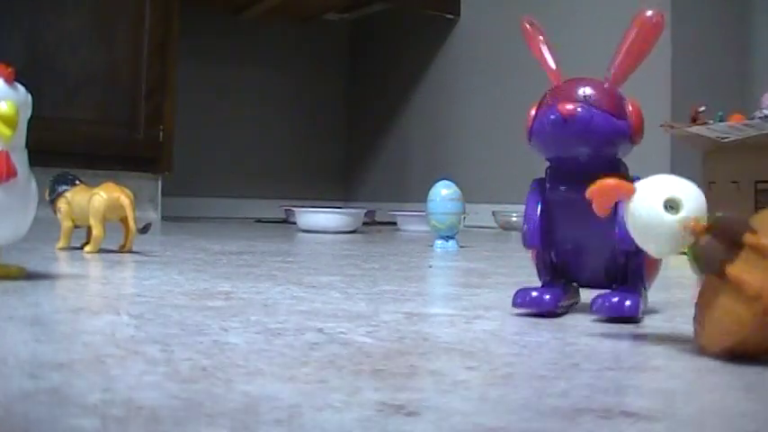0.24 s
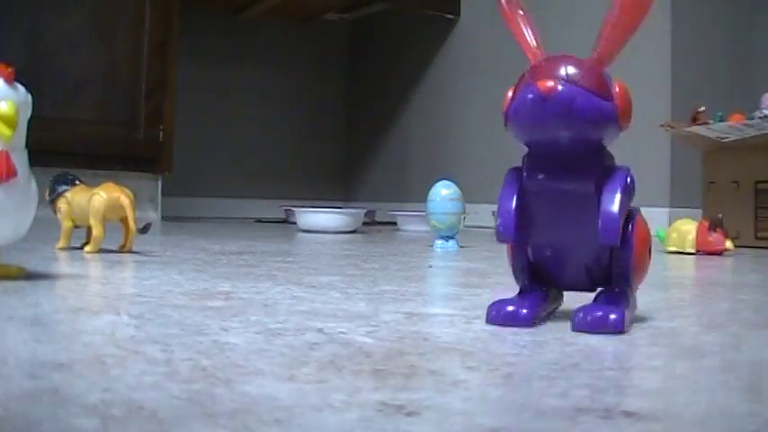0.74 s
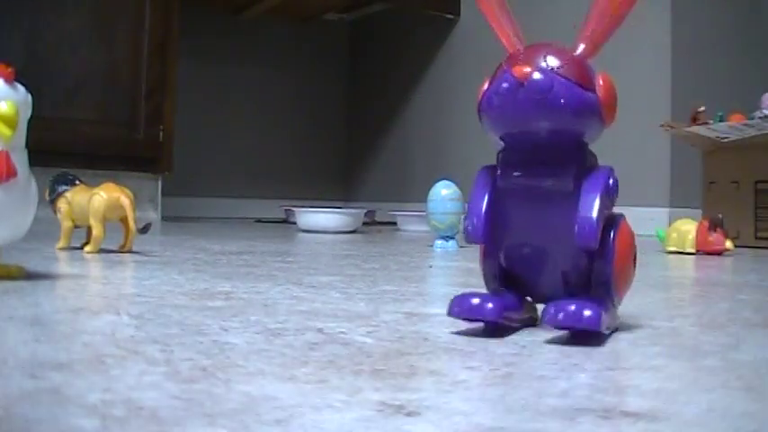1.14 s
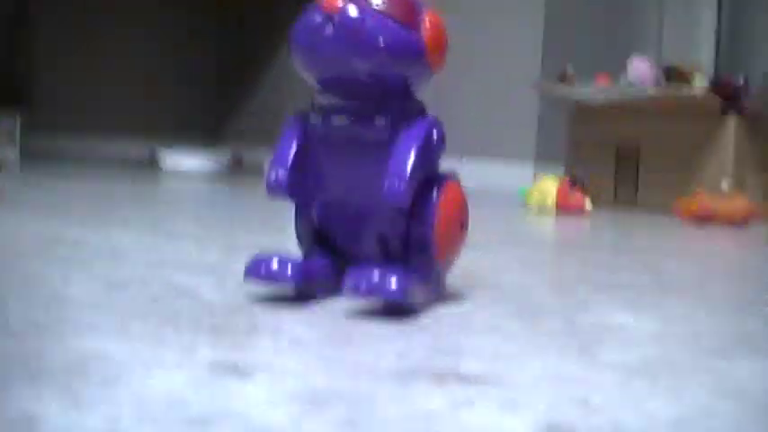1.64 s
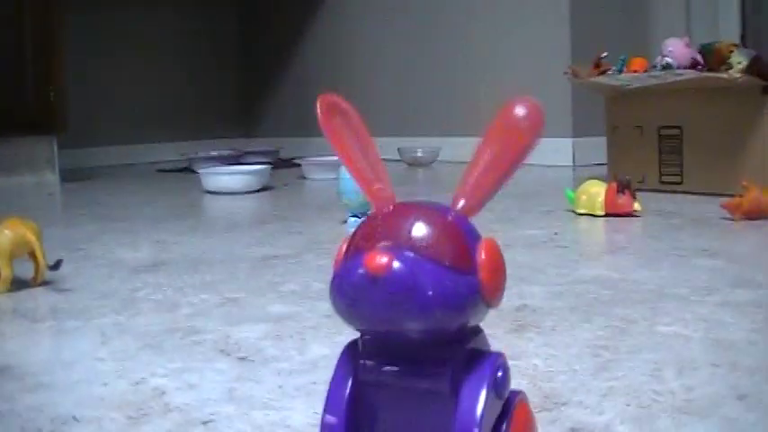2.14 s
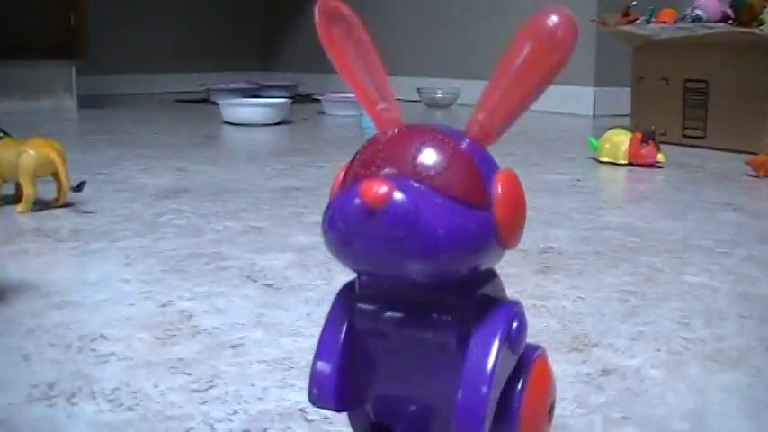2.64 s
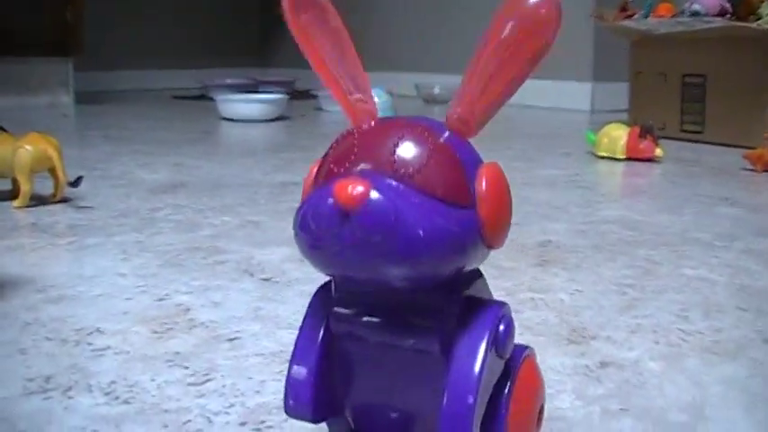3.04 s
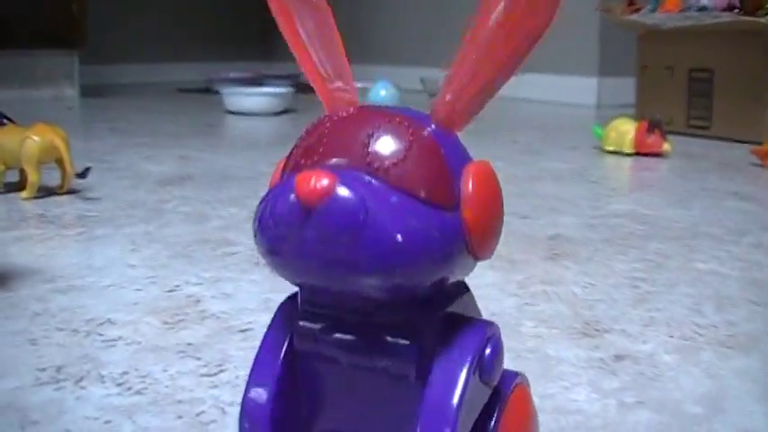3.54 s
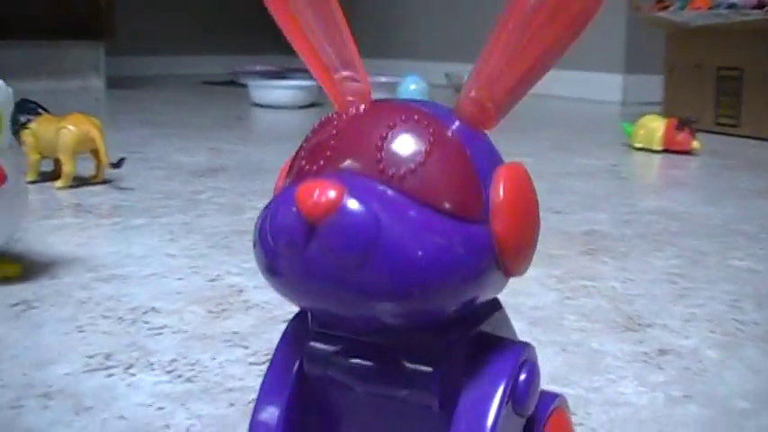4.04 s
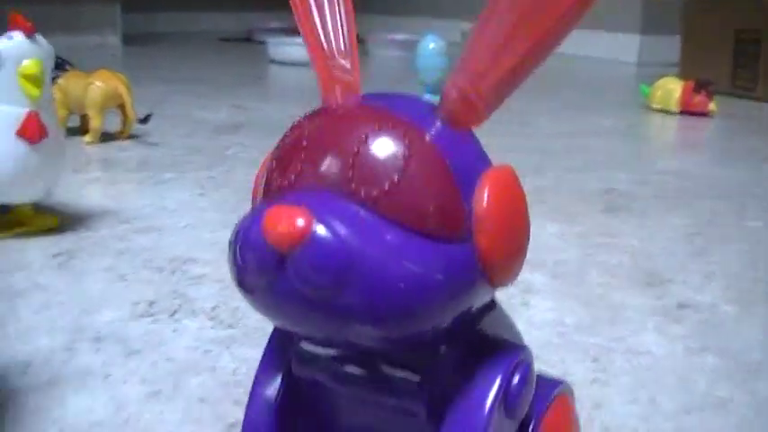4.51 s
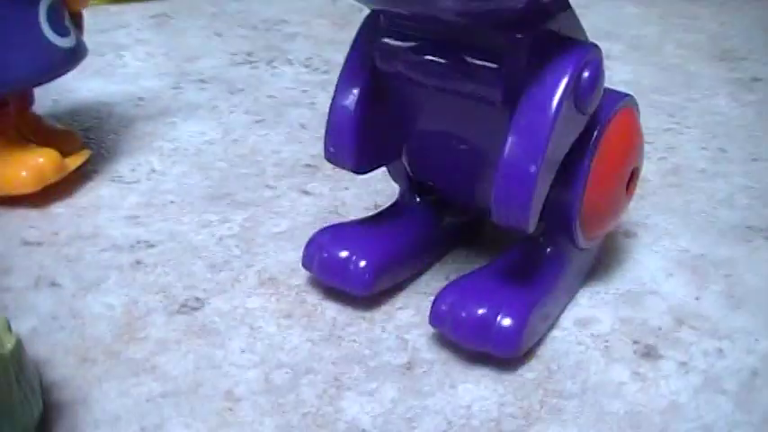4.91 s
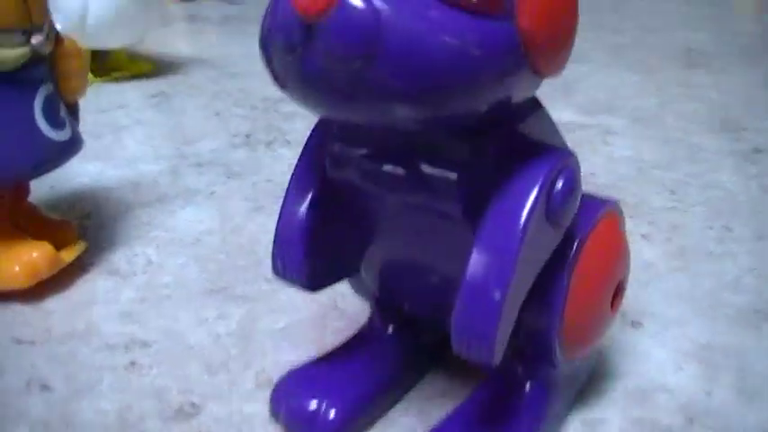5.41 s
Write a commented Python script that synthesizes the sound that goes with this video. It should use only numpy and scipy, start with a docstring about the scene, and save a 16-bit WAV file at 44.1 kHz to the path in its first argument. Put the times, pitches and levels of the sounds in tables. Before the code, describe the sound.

A plastic wind-up rabbit waddles over a hard kitchen floor with fast tick-tock clacks and whirring gears, gradually slowing, beside other rattling toys.

```python
"""Kitchen, hard floor, close by: a plastic wind-up rabbit waddles past at about six strides a second, slowing.
Each stride is a tick, a tap of the leg crank, a tock and a footfall: noise contacts through resonant modes.
Gear teeth whirr as trains of short noise pulses; other toys trundle over the floor and one is slid away.
The small room adds a ceiling echo and a short noise tail; still air lies under it all."""
import sys
import numpy as np
from scipy import signal
from scipy.fft import rfft, irfft
from scipy.io import wavfile

SR = 44100
rng = np.random.default_rng(int(sys.argv[2]) if len(sys.argv) > 2 else 0)


def wav_out(sig):
    """Save sig, one row per channel (or a flat mono array), as 16-bit PCM at SR to the path in sys.argv[1]."""
    wavfile.write(sys.argv[1], SR, np.round(np.clip(np.atleast_2d(sig).T, -1, 1) * 32767).astype(np.int16))


N = 250034
TIME = np.arange(N) / SR
AGE = np.arange(2048) / SR  # time since a contact, s

# tick opening each stride, and the crank tap after it: start_s, tick_db, ring_hz, rattle_db, tap_db
TICKS = [(0.046, -20, 11700, -6, -41), (0.2246, -20, 5200, -12, -30.5), (0.3939, -20.5, 4300, -13, -27),
         (0.5502, -22.5, 7600, -6, -31), (0.7078, -22, 4400, 14, -30), (0.8628, -20.5, 4530, -7.5, -34.5),
         (1.0441, -20, 5450, -3, -27.5), (1.191, -22, 7460, 9, -27), (1.3628, -22.5, 4200, -9, -27),
         (1.5408, -22.5, 4450, -7, -29), (1.7001, -23.5, 8940, -12, -28.5),
         (1.8596, -21.5, 7100, -5.5, -29.5), (2.036, -19, 8560, -7, -27.5),
         (2.2187, -18.5, 7000, -10.5, -27), (2.3776, -21.5, 7360, -16, -44), (2.5547, -19.5, 6700, -9, -28),
         (2.7133, -20.5, 9300, -12, -33.5), (2.963, -20, 7050, -17, -28), (3.1357, -20, 6900, -7, -46),
         (3.2989, -18.5, 8400, -11, -28.5), (3.4628, -21, 8200, -14, -22), (3.637, -19.5, 7240, -16, -28.5),
         (3.8078, -20.5, 6950, -8, -26.5), (3.976, -20, 7300, -9, -31.5), (4.1541, -21, 7200, -7.5, -28.5),
         (4.3209, -20, 8200, -14, -27.5), (4.5127, -19, 7760, -14, -32), (4.6835, -19, 7800, -12, -55),
         (4.91, -18, 6700, -14, -27.5), (5.1128, -21, 5130, -9, -50), (5.3593, -18, 7540, -8, -29.5),
         (5.6429, -18, 8600, -2.5, -40)]
# tock closing each stride, and the footfall after it: start_s, tock_db, ring_hz, rattle_db, fall_s, landing_db
TOCKS = [(0.1542, -33.5, 11900, -10, 0.016, -59), (0.3173, -18, 8550, -1, 0.036, -27),
         (0.471, -18, 4600, 15, 0.028, -34), (0.6353, -18.5, 4300, -3, 0.029, -28.5),
         (0.7811, -16.5, 7800, 15, .0261, -26.5), (0.9622, -16, 7860, 15, .0335, -26.5),
         (1.1178, -17, 4600, -7, 0.027, -30.5), (1.2828, -16.5, 8150, -13.5, 0.035, -33.5),
         (1.4552, -16.5, 7600, -3, 0.03, -35), (1.6239, -17.5, 4400, 6, 0.032, -32),
         (1.7848, -18.5, 4530, 1, 0.03, -30), (1.9546, -17.5, 8400, -14.5, 0.03, -30),
         (2.121, -18, 7800, 12, 0.028, -27), (2.3116, -16.5, 8000, -12.5, .0393, -32),
         (2.457, -16.5, 7900, 9, 0.035, -29.5), (2.649, -17.5, 8200, -5, 0.054, -27),
         (2.8016, -16.5, 7300, -13, .033, -34.5), (3.0665, -16.5, 7600, -1, .0376, -28),
         (3.206, -16.5, 7400, -10, 0.039, -26.5), (3.3878, -15.5, 7900, -6, .0396, -26.5),
         (3.548, -16, 8200, -15, .0395, -26.5), (3.728, -16.5, 7900, -4.5, 0.031, -30),
         (3.8987, -17.5, 8440, -11, 0.048, -30.5), (4.0624, -18, 7940, 1, 0.03, -38),
         (4.2441, -17, 8010, -15, 0.037, -31.5), (4.4053, -19, 4500, -2, 0.029, -31.5),
         (4.6233, -18, 8200, -1, 0.039, -27.5), (4.7612, -16.5, 8500, 0, 0.033, -31.5),
         (5.0402, -20, 4530, -9, 0.041, -29), (5.1914, -18, 7900, 14, 0.036, -31.5),
         (5.5092, -19, 7950, -3, 0.047, -33.5)]
# spectrum of the gear teeth: frequency_hz, density_db (per Hz)
TEETH = [(4000, -80), (5600, 12), (7600, 9.5), (9500, 10.5), (11500, 10), (13500, -6), (16000, -32)]


def from_db(db):
    """Decibels to gain."""
    return 10 ** (np.asarray(db) / 20)


def rms_one(x):
    """Scale to rms 1."""
    return x / np.sqrt(np.mean(x ** 2) + 1e-20)


def curve(rows):
    """Interpolate a two-column table over the scene."""
    s, values = np.transpose(rows)
    return np.interp(TIME, s, values)


def colour(x, points):
    """Shape a noise by a spectrum, falling 12 dB per octave below its first point."""
    hz, db = np.transpose(points)
    bins_hz = np.maximum(np.fft.rfftfreq(len(x), 1 / SR), 1)
    below = np.minimum(bins_hz / hz[0], 1) ** 2
    gain = from_db(np.interp(np.log(bins_hz), np.log(hz), db))
    return irfft(rfft(x) * below * gain, len(x))


def colour_noise(points):
    """Noise of a given spectrum, rms 1."""
    return rms_one(colour(rng.standard_normal(N), points))


def band(x, low_hz, high_hz, order=2):
    """Causal Butterworth band-pass."""
    high_hz = min(high_hz, 0.48 * SR)
    return signal.sosfilt(signal.butter(order, [low_hz, high_hz], btype="band", fs=SR, output="sos"), x)


def resonate(x, hz, width_hz):
    """One two-pole resonance, gain 1 on top."""
    r = np.exp(-np.pi * width_hz / SR)
    zeros = np.array([1, 0, -1]) * (1 - r * r) / 2
    poles = [1, -2 * r * np.cos(2 * np.pi * hz / SR), r * r]
    return signal.lfilter(zeros, poles, x + 1e-18)


def body(x, modes):
    """Modes of a part ringing side by side."""
    return sum(from_db(db) * resonate(x, hz, width_hz) for hz, width_hz, db in modes)


def contact(snap_s, rattle_db, rattle_s, grit_db):
    """Noise burst: a snap peaking at snap_s, then uneven tiny rebounds peaking at rattle_s that settle."""
    snap = (AGE / snap_s) ** 2 * np.exp(2 - 2 * AGE / snap_s)
    rebounds = np.repeat(from_db(grit_db * rng.standard_normal(len(AGE) // 32)), 32)
    swell = AGE / rattle_s * np.exp((1 - (AGE / rattle_s) ** 2) / 2)
    rattle = from_db(rattle_db) * swell * rebounds
    return rng.standard_normal(len(AGE)) * np.hypot(snap, rattle)


def add(out, start_s, sound, edges_hz, levels_db):
    """Place one hit, each register set to its own rms over the first 12 ms."""
    first, start = int(0.012 * SR), int(start_s * SR)
    for low_hz, high_hz, db in zip(edges_hz, edges_hz[1:], levels_db):
        part = band(sound, low_hz, high_hz, order=3)
        part = part * from_db(db) / np.sqrt(np.mean(part[:first] ** 2))
        out[start:start + len(part)] += part[:N - start]


def tooth_pulses(per_s, uneven, decay_s, spread_db):
    """Each tooth slipping into mesh gives a brief pulse; slack gears tick unevenly (in tooth spacings)."""
    turned = np.cumsum(per_s) / SR
    teeth = np.arange(int(turned[-1]))
    slack, size = rng.standard_normal((2, len(teeth)))
    at = np.searchsorted(turned, teeth + slack * np.interp(teeth, turned, uneven))
    clicks = np.zeros(N)
    clicks[np.minimum(at, N - 1)] = from_db(spread_db * np.clip(size, -2, 2))
    pulse = (AGE / decay_s) ** 2 * np.exp(-AGE / decay_s)
    return rms_one(signal.fftconvolve(clicks, pulse)[:N])


def gear_train(per_s, uneven, teeth_gain, chatter_gain):
    """Teeth tick brightly and the gear case chatters, jolting at half the tooth rate."""
    # frequency_hz, density_db (per Hz)
    chatter_colour = [(900, -3.5), (1300, -0.5), (2000, -3.5), (2700, -3), (3600, -3.5), (4500, 1.5),
                      (5400, -2), (6500, -10)]
    per_s, uneven = per_s * np.ones(N), np.full(N, uneven)
    pulses = tooth_pulses(per_s, uneven, decay_s=0.00048, spread_db=2)
    jolts = tooth_pulses(per_s / 2, np.ones(N), decay_s=0.0008, spread_db=3)
    # slack gears also grind between their ticks
    pulses = rms_one(np.hypot(pulses, 2 * uneven))
    teeth = teeth_gain * pulses * colour_noise(TEETH)
    chatter = chatter_gain * rms_one(pulses + jolts) * colour_noise(chatter_colour)
    return teeth + chatter


def efforts(tick_offset_db):
    """Every beat as (start_s, effort_db re the hardest tock), the ticks offset."""
    hardest_db = max(db for _, db, *_ in TOCKS)
    beat_sets = ((TICKS, tick_offset_db), (TOCKS, 0))
    return [(s, db + offset_db - hardest_db) for rows, offset_db in beat_sets for s, db, *_ in rows]


def still_air():
    """Steady faint noise, strongest in the bass."""
    # frequency_hz, density_db (per Hz)
    air_colour = [(25, 4), (60, -4), (100, -8), (150, -2), (260, -2), (600, -8), (2000, -16), (8000, -21),
                  (16000, -28)]
    return from_db(-59) * colour_noise(air_colour)


def rolling():
    """Floor modes drum under trundling toys, whose gears rattle more steeply as they push harder."""
    # start_s, level_db
    push = [(0, -49.5), (.08, -37), (.22, -42), (.3, -33), (.45, -35), (.63, -31.5), (.79, -33.5),
            (.86, -40), (1.2, -45), (1.42, -35.5), (1.62, -37.5), (1.85, -45), (2.1, -43.5), (2.9, -58),
            (3.3, -50), (4, -60), (5.3, -59)]
    # floor modes: frequency_hz, width_hz, gain_db
    floor = [(140, 19, 1.5), (212, 8.2, -34), (260.7, 13.6, 10.5), (363, 130, 6), (539, 46, 7),
             (609, 62, -2.5), (780, 45, -16), (1190, 1100, -12)]
    teeth_per_s, uneven = 260, 0.2
    usual_db, steepness = -35, 2.02
    teeth_at_usual_db, chatter_at_usual_db = -41.5, -33.5
    level_db = curve(push)
    effort_db = steepness * (level_db - usual_db)
    jolts = tooth_pulses(np.full(N, teeth_per_s / 2), np.ones(N), decay_s=0.0011, spread_db=-1.5)
    floor_ring = body(jolts * rng.standard_normal(N), floor)
    drum = from_db(level_db - 0.5) * rms_one(band(floor_ring, low_hz=215, high_hz=2400))
    teeth_gain = from_db(teeth_at_usual_db + effort_db)
    chatter_gain = from_db(chatter_at_usual_db + effort_db)
    train = gear_train(teeth_per_s, uneven, teeth_gain, chatter_gain)
    case = from_db(-12) * resonate(train, hz=4420, width_hz=120)
    return drum + train + case


def spin():
    """Gear motion: each beat sets it going by its strength, then it brakes; weaker as the spring runs down."""
    spin_s, run_down_db_per_s = 0.06, 2.6
    motion = np.zeros(N)
    for s, db in efforts(tick_offset_db=-8):
        motion += from_db(db) * (TIME > s) * np.exp(-((TIME - s) / spin_s) ** 2 / 2)
    return motion * from_db(-run_down_db_per_s * TIME)


def run_up(span_s):
    """Friction building before each beat, steeply more for a hard one; fades as the spring runs down."""
    steepness, fade_db_per_s = 2.4, 0.5
    s, db = np.transpose(efforts(tick_offset_db=-4))
    drops = np.zeros(N)
    drops[(s * SR).astype(int)] = from_db(steepness * db - fade_db_per_s * s)
    # a decay run backwards in time
    return signal.lfilter([1], [1, -np.exp(-1 / (span_s * SR))], drops[::-1] + 1e-18)[::-1]


def gears():
    """The rabbit's gears spin in spurts, chatter under load and rub the pallet before each beat."""
    teeth_per_s, uneven = 150, 0.25
    teeth_db, chatter_db, load_db, rub_db = -37, -33, -25.5, -21.5
    motion, load = spin(), run_up(span_s=0.012)
    chatter_gain = from_db(chatter_db) * motion + from_db(load_db) * load
    train = gear_train(teeth_per_s, uneven, from_db(teeth_db) * motion, chatter_gain)
    # the pallet rubs along its tooth just before it drops
    rub = from_db(rub_db) * run_up(span_s=0.0016) * colour_noise(TEETH)
    return train + rub


def fullness_db(s):
    """Bass strength of a beat: thins as the rabbit walks up, then partly returns."""
    # start_s, bass_db
    fullness = [(0, 4), (1.8, 1.5), (3.2, -10), (4.5, -9.5), (5.67, 0)]
    return np.interp(s, *np.transpose(fullness))


def beats():
    """Ticks and tocks as (start_s, thud_db, middle_db, bright_db, top_db, ring_hz, rattle_db)."""
    tick_registers_db, tock_registers_db = (-11, -5.5, 1.5, -5.5), (-17, -4, 1.5, -6.5)
    middle_follows, low_ring_db = 0.14, 2.5
    out = []
    for rows, registers_db in ((TICKS, tick_registers_db), (TOCKS, tock_registers_db)):
        for s, db, ring_hz, rattle_db, *_ in rows:
            bass_db = fullness_db(s)
            # a low ring swells the middle register
            middle_db = middle_follows * bass_db + low_ring_db * (ring_hz < 5500)
            levels_db = db + np.array(registers_db) + [bass_db, middle_db, 0, 0]
            out.append((s, *levels_db, ring_hz, rattle_db))
    return out


def escapement():
    """The anchor strikes the hollow shell from inside; each beat favours one mode of its own."""
    # shell modes: frequency_hz, width_hz, gain_db
    shell = [(276, 43, 7), (550, 460, 4), (632, 62, 14.5), (860, 160, -4), (2674, 170, 9),
             (3300, 1040, 8.5), (4590, 275, 12.5), (5196, 370, 8.5), (7240, 1470, 10.5), (8220, 290, 10),
             (9400, 230, 7), (11480, 1900, 8)]
    out, edges_hz = np.zeros(N), [200, 1200, 5500, 10000, 17000]
    for s, *levels_db, ring_hz, rattle_db in beats():
        push = contact(snap_s=0.00082, rattle_db=rattle_db, rattle_s=0.0036, grit_db=-0.5)
        ring = from_db(17) * resonate(push, ring_hz, width_hz=330)
        add(out, s, push + body(push, shell) + ring, edges_hz, levels_db)
    return from_db(0.5) * out


def knocks(rows, registers_db):
    """Leg contacts (start_s, strength_db) as (start_s, thud_db, middle_db, bright_db)."""
    # start_s, bass_db
    leg_bass = [(0, 4), (1.3, 2), (2, 0.5), (2.8, -6.5), (3.4, -10), (3.9, -9.5), (4.6, -3), (5.2, -2.5),
                (5.67, 6)]
    out = []
    for s, db in rows:
        if s < N / SR:
            bass_db = np.interp(s, *np.transpose(leg_bass))
            out.append((s, *(db + np.array(registers_db) + [bass_db, 0, 0])))
    return out


def feet():
    """Feet land with a short dull clack after each tock; after each tick the crank taps twice, 4-13 ms apart."""
    # leg and foot modes on the floor: frequency_hz, width_hz, gain_db
    legs = [(274, 23, 11.5), (378, 35, -4.5), (580, 130, 7.5), (778, 87, 1), (1370, 350, 0),
            (3200, 2900, -2.5), (4210, 56, -10), (7150, 350, 2), (8600, 190, 3), (9300, 170, 9)]
    # crank modes inside the hips: frequency_hz, width_hz, gain_db
    crank = [(670, 260, 9.5), (2610, 460, 24.5), (2910, 750, 5.5), (4520, 54, -9)]
    # extra foot knocks as the rabbit rocks: start_s, thud_db, middle_db, bright_db
    stumbles = [(0.0763, -31.5, -28, -32), (0.2776, -31, -28, -28), (0.3136, -47, -27.5, -21),
                (0.767, -29.5, -26, -30.5), (1.276, -38, -28, -33), (1.5153, -37, -31, -37.5),
                (1.5582, -27.5, -42, -45), (3.2216, -40, -26.5, -22), (4.985, -45, -33, -32.5),
                (5.4378, -43, -29.5, -30.5)]
    landing_registers_db, tap_registers_db = (-2.5, 2, 2.5), (-8, 1, -1.5)
    # taps come a little later as the spring runs down
    tap_delay_s, tap_slowing_s_per_s = 0.0455, 0.0014
    out, edges_hz = np.zeros(N), [200, 1200, 5500, 17000]
    landings = [(s + fall_s, db) for s, *_, fall_s, db in TOCKS]
    taps = [(s + tap_delay_s + tap_slowing_s_per_s * s, db) for s, *_, db in TICKS]
    for s, *levels_db in knocks(landings, landing_registers_db) + stumbles:
        push = contact(snap_s=0.00055, rattle_db=-15, rattle_s=0.0035, grit_db=3)
        push = band(push, low_hz=120, high_hz=12000)
        add(out, s, push + body(push, legs), edges_hz, levels_db)
    for s, *levels_db in knocks(taps, tap_registers_db):
        push = contact(snap_s=0.00076, rattle_db=1.5, rattle_s=0.0031, grit_db=2.5)
        push = band(push, low_hz=170, high_hz=10700)
        second_tap = np.roll(push, int(rng.uniform(0.0044, 0.013) * SR))
        push = push + from_db(-10.5) * second_tap
        add(out, s, push + body(push, crank), edges_hz, levels_db)
    return from_db(0.5) * out


def slide():
    """A toy slid away by hand: its plastic feet hiss over the fine grain of the floor."""
    # start_s, level_db
    skid = [(0, -120), (.49, -90), (.505, -32), (.53, -22), (.58, -29), (.7, -38), (.8, -33), (.86, -60),
            (.9, -120)]
    # frequency_hz, density_db (per Hz)
    hiss_colour = [(5000, -15), (8000, -11), (10500, 1), (12000, 0), (13600, -5), (16000, -28)]
    grain = tooth_pulses(np.full(N, 900), np.ones(N), decay_s=0.00035, spread_db=3)
    return from_db(curve(skid)) * grain * colour_noise(hiss_colour)


def whirr():
    """A free-running gear train buzzes faster and louder together; fine teeth add a thin top sizzle."""
    # start_s, level_db
    run = [(3.19, -75), (3.24, -37), (3.33, -38), (3.42, -54), (3.52, -51.5), (3.58, -33), (3.72, -30.5),
           (3.79, -41), (3.86, -32), (4, -28.5), (4.18, -35.5), (4.42, -37.5), (4.62, -33), (4.79, -40.5),
           (4.85, -75.5)]
    usual_db, usual_teeth_per_s, db_per_octave = -33, 185, 24
    teeth_db, chatter_db = -3.5, -9  # re the run level
    level_db = curve(run)
    per_s = usual_teeth_per_s * 2 ** ((level_db - usual_db) / db_per_octave)
    teeth_gain, chatter_gain = from_db(level_db + teeth_db), from_db(level_db + chatter_db)
    train = gear_train(per_s, 0.15, teeth_gain, chatter_gain)
    sizzle = from_db(5) * resonate(train, hz=15000, width_hz=1900)
    return train + sizzle


def belly(x):
    """One broad low resonance of the hollow belly, fuller as the rabbit comes close, then thinner."""
    # start_s, gain_db (at the resonance)
    closeness = [(0, -3), (1.9, -5.5), (2.8, 6), (4, 7), (5.67, -4)]
    return x + (from_db(curve(closeness)) - 1) * resonate(x, hz=238, width_hz=270)


def kitchen(x, ceiling_s, ceiling_db):
    """A ceiling echo and a diffuse noise tail whose treble lingers slightly longer."""
    # frequency_hz, gain_db
    room_colour = [(120, 12), (260, 4.5), (600, 4), (1200, 5), (2500, 2), (4600, 0.5), (8000, 1.5),
                   (12000, -6), (16000, -21)]
    t60_s, treble_t60_s, tail_db = 0.18, 0.22, -16
    t = TIME[:SR]
    noise = colour(rng.standard_normal(SR), room_colour)
    dull = colour(noise, [(20, 0), (900, 0), (5000, -20)])
    tail = dull * from_db(-60 * t / t60_s) + (noise - dull) * from_db(-60 * t / treble_t60_s)
    onset = 1 - np.exp(-(t / 0.00077) ** 2)
    response = from_db(tail_db) * rms_one(tail * onset) / np.sqrt(SR)
    response[int(ceiling_s * SR)] += from_db(ceiling_db)
    return signal.fftconvolve(x, response)[:N]


def scene():
    """The toys, their room and the still air."""
    toys = belly(rolling() + gears() + escapement() + feet() + slide() + whirr())
    room = kitchen(toys, ceiling_s=0.016, ceiling_db=-24)
    return (toys + room + still_air())[None]


def record(dry):
    """A small microphone: rounded peaks, thin bass, the top cut off."""
    rounded = 1.531 * np.tanh(dry / 1.892)
    thin = signal.sosfilt(signal.butter(2, 120, "high", fs=SR, output="sos"), rounded)
    # 16 kHz low-pass, 0.3 dB ripple, 70 dB stop band
    return signal.sosfilt(signal.ellip(10, 0.3, 70, 16000, fs=SR, output="sos"), thin)


dry = scene()
out = record(dry)
wav_out(out)
```